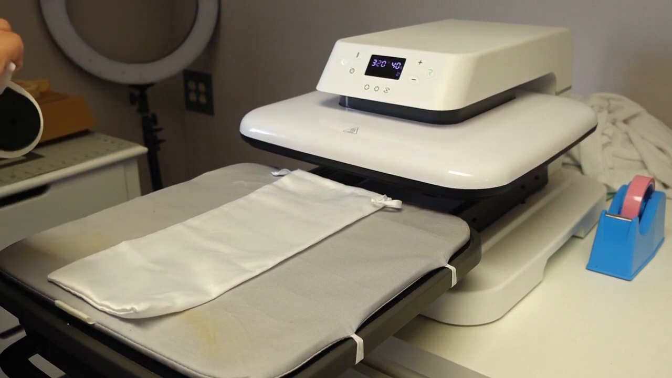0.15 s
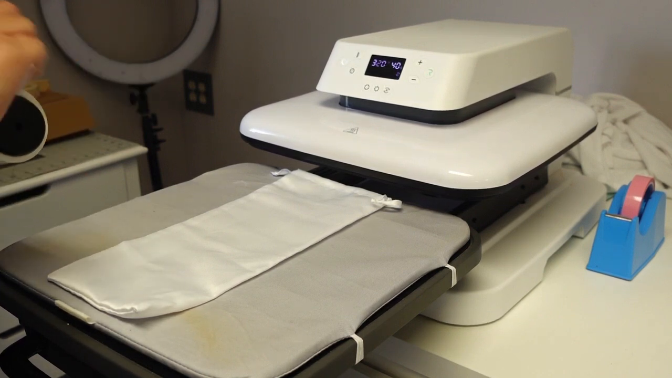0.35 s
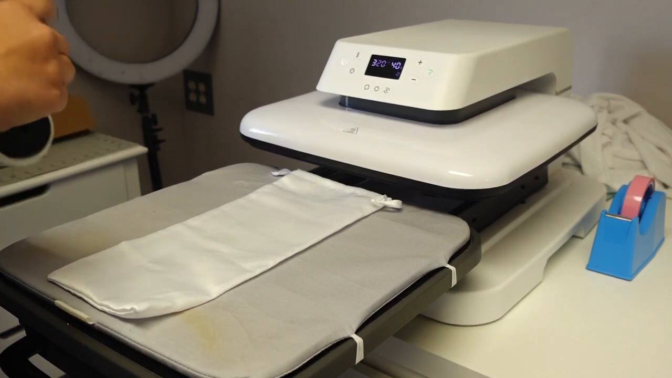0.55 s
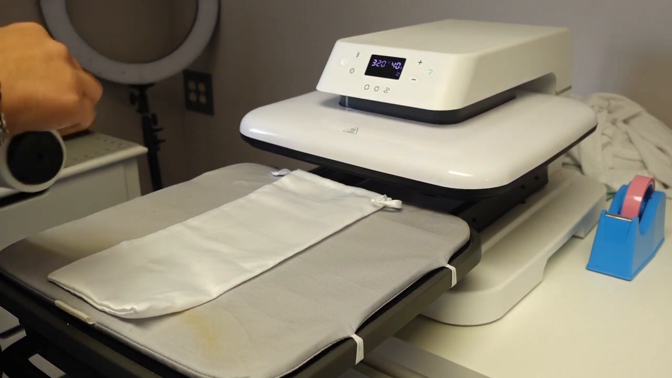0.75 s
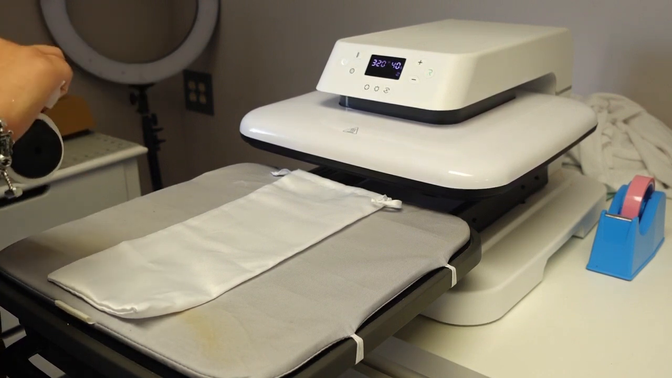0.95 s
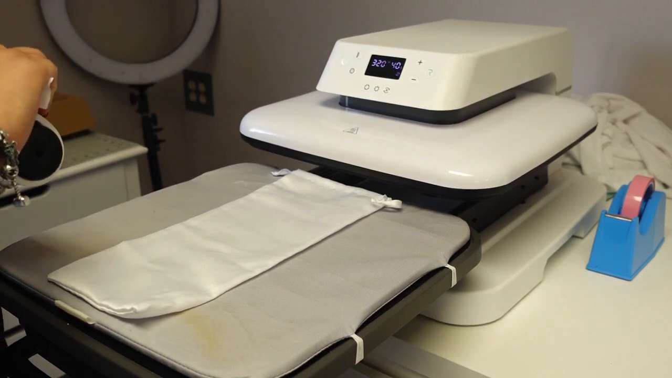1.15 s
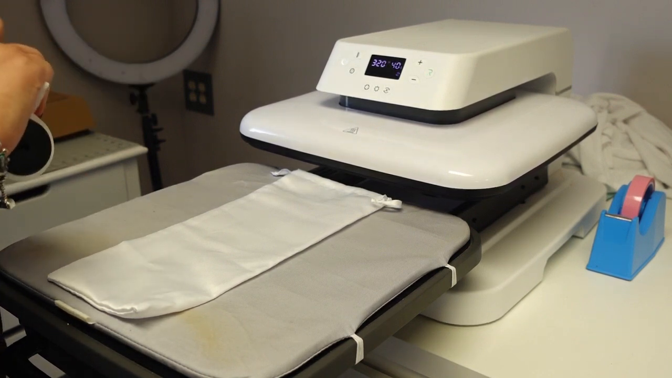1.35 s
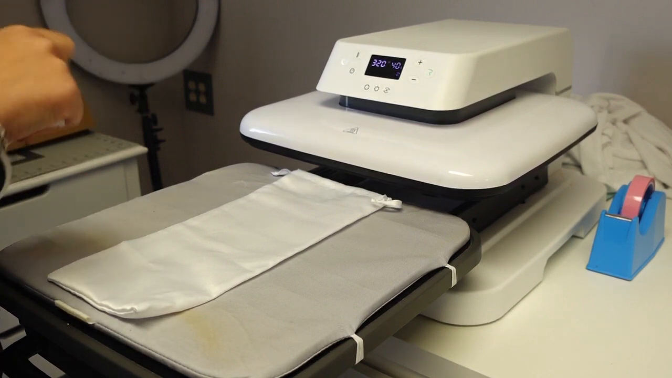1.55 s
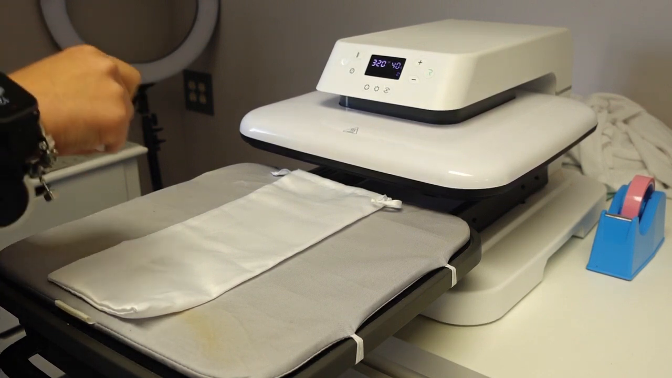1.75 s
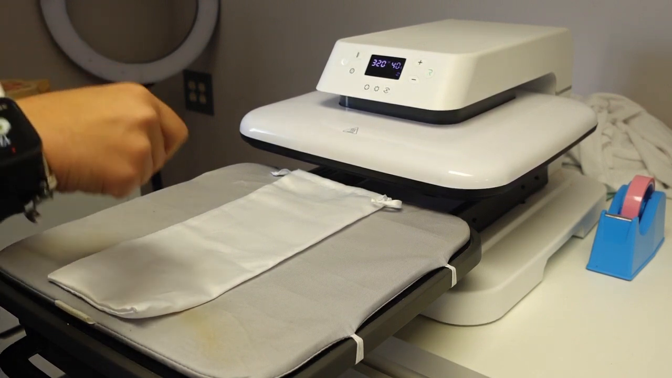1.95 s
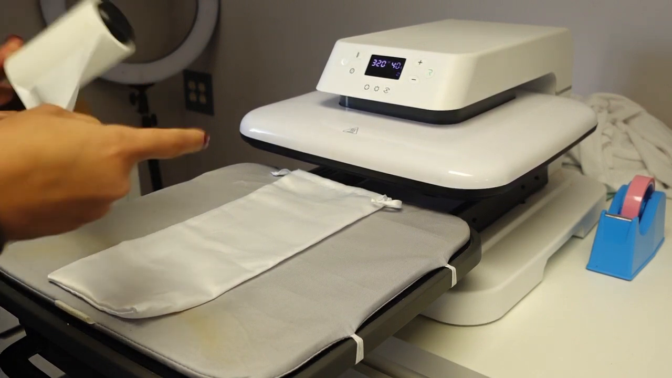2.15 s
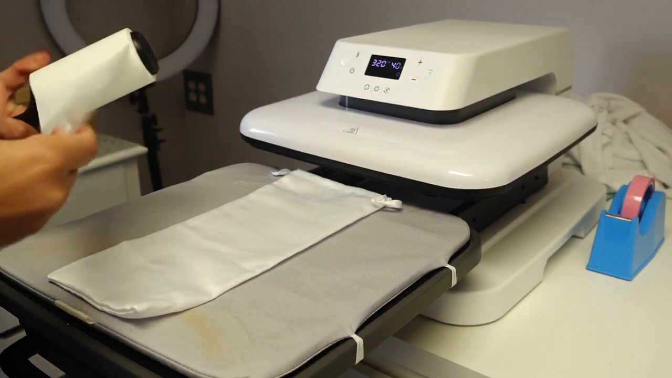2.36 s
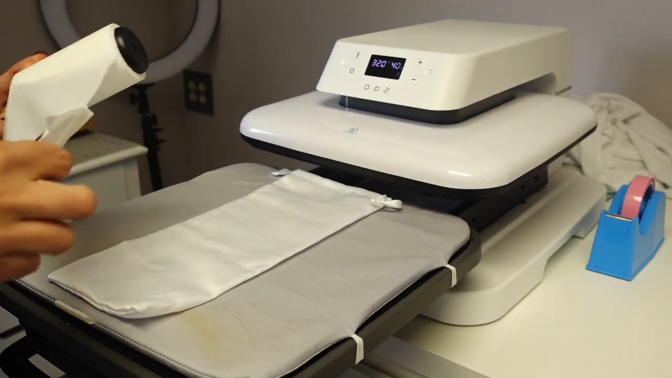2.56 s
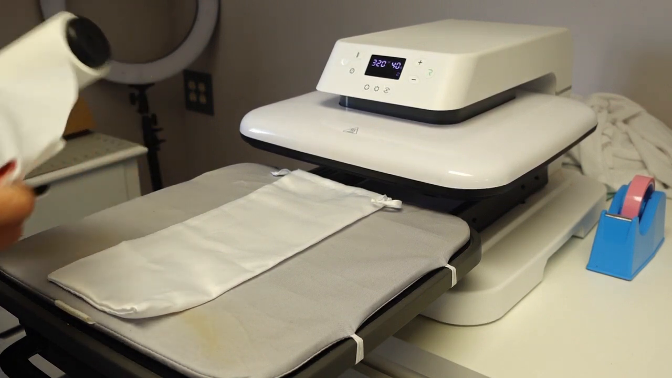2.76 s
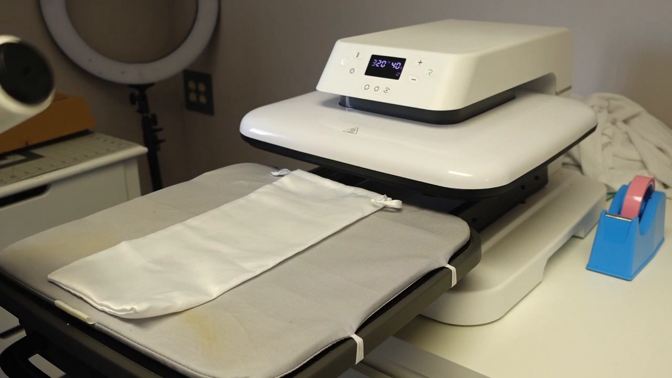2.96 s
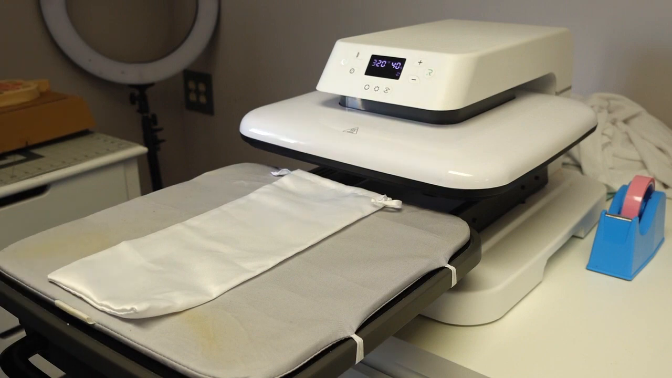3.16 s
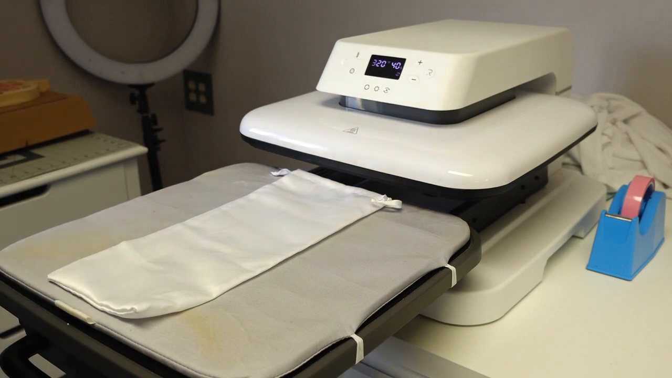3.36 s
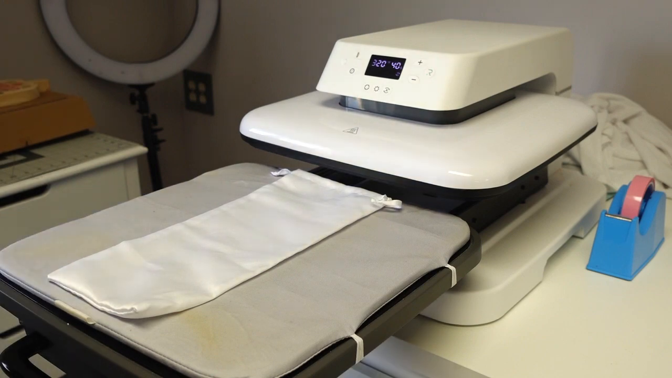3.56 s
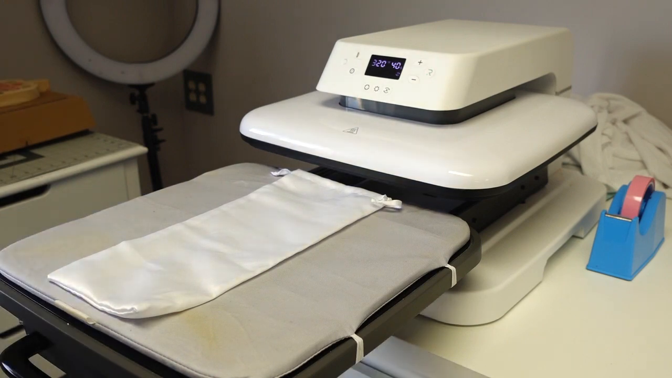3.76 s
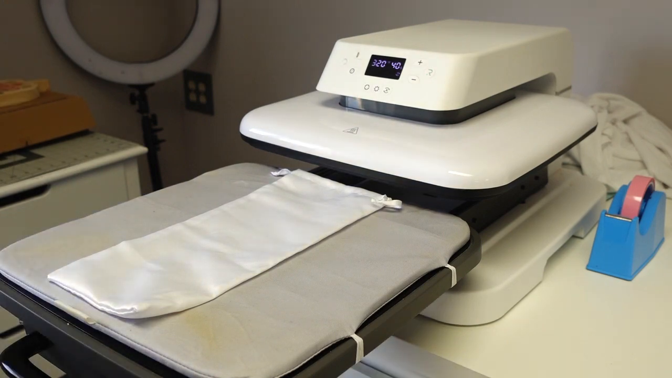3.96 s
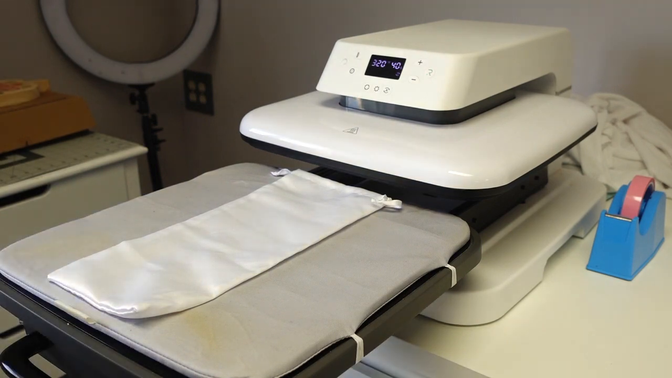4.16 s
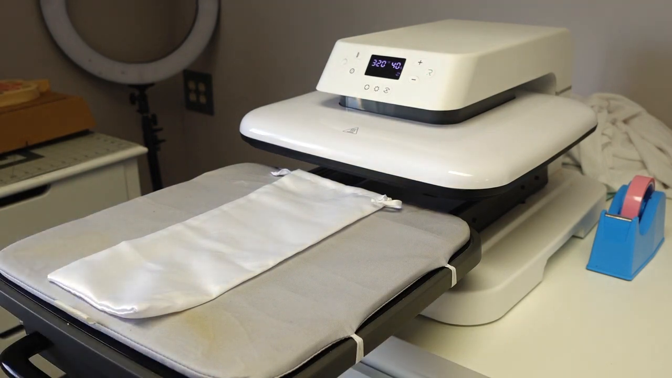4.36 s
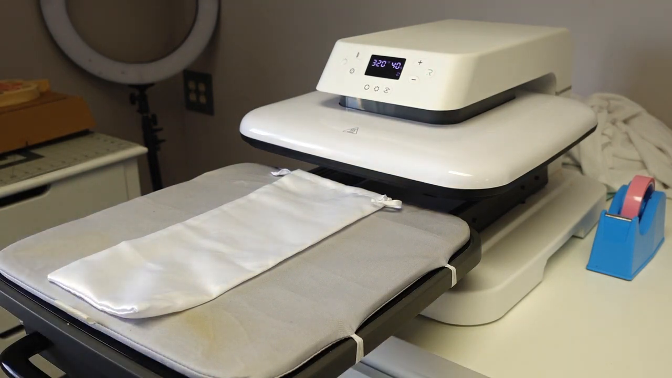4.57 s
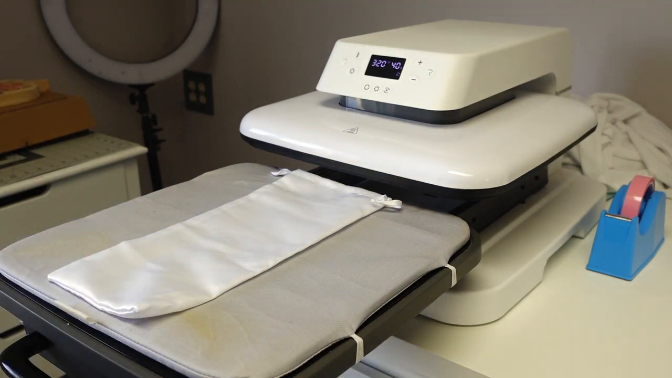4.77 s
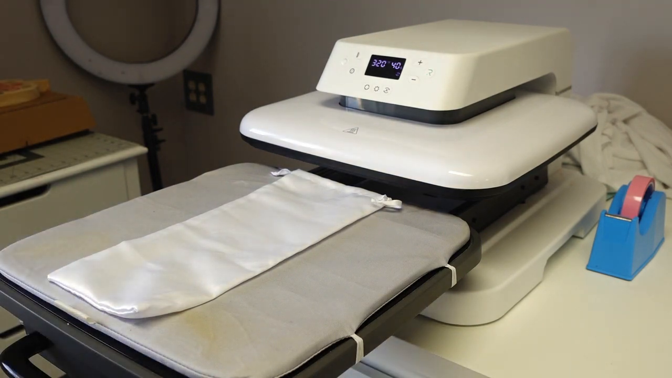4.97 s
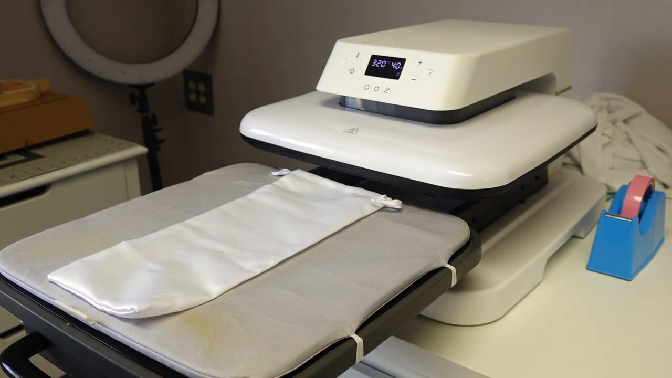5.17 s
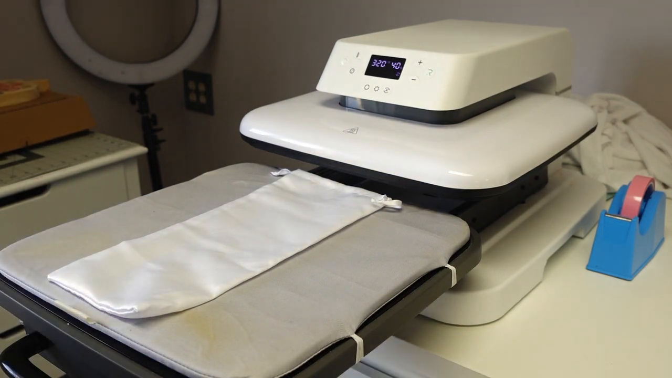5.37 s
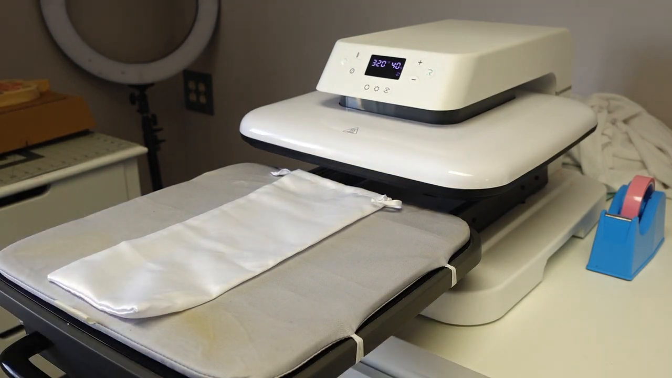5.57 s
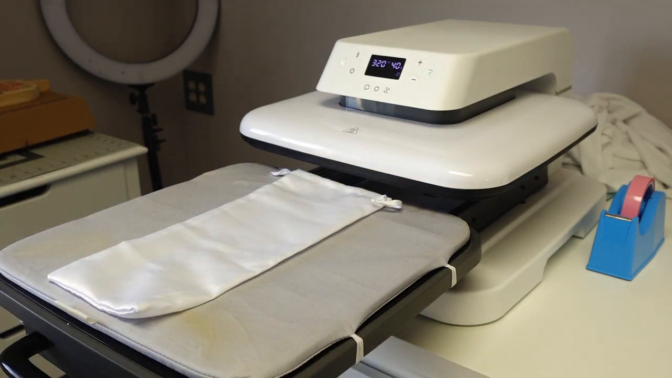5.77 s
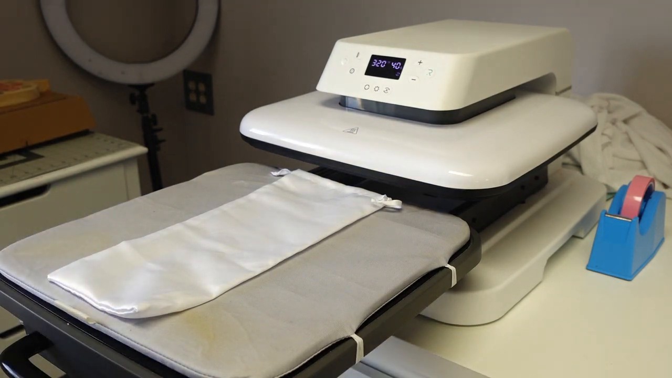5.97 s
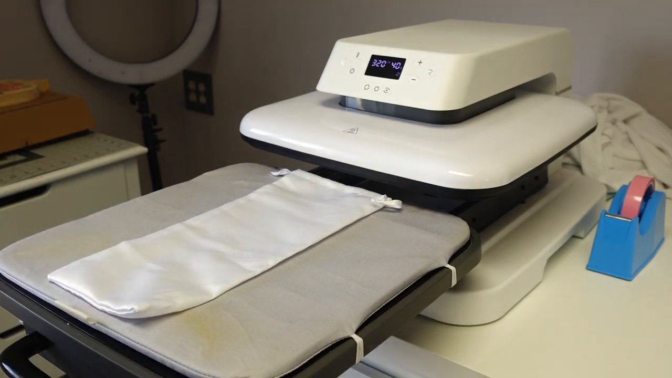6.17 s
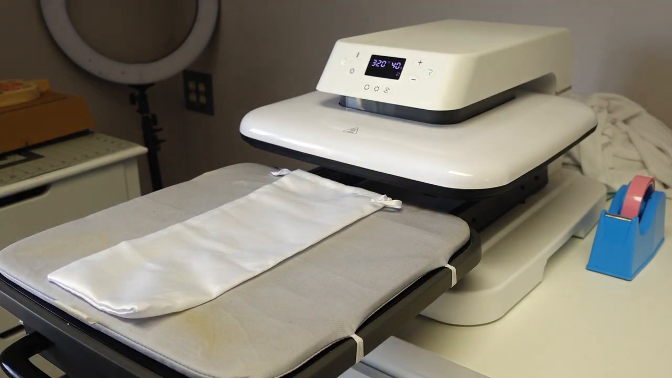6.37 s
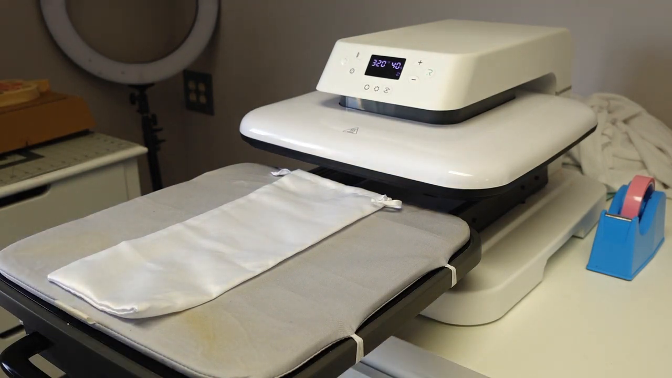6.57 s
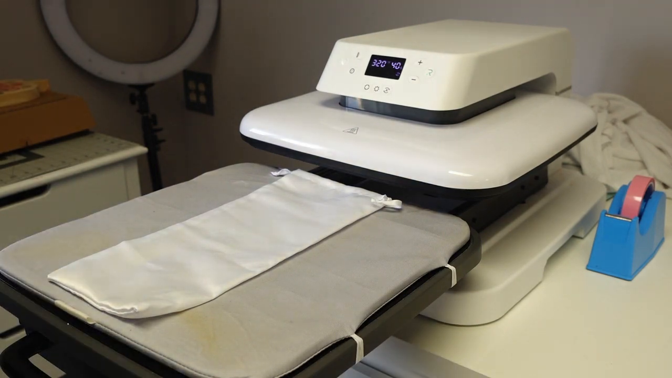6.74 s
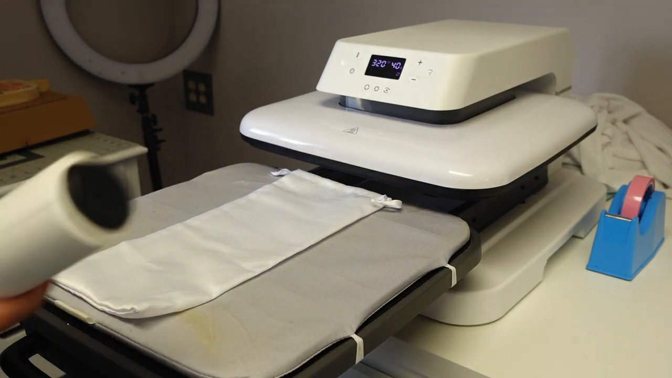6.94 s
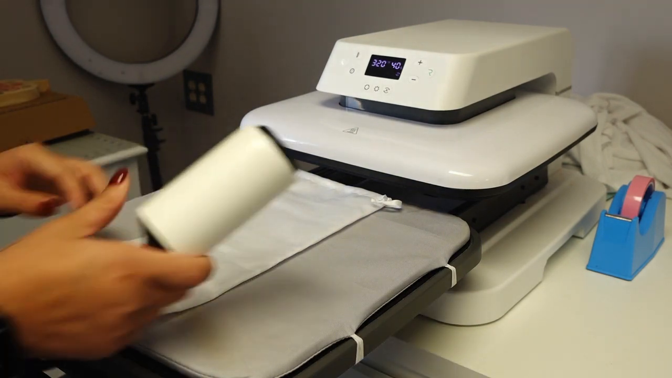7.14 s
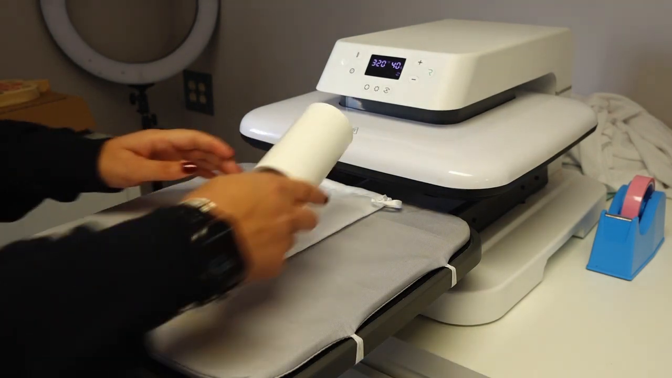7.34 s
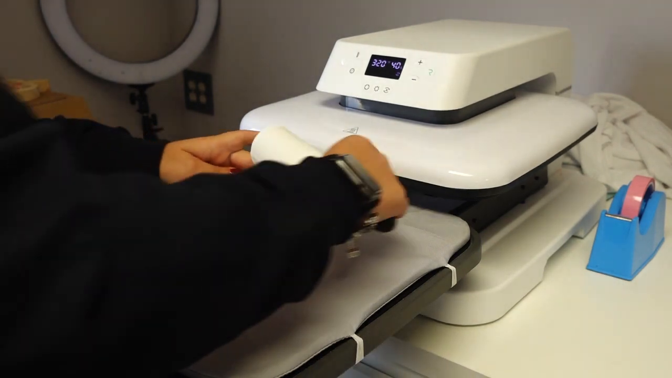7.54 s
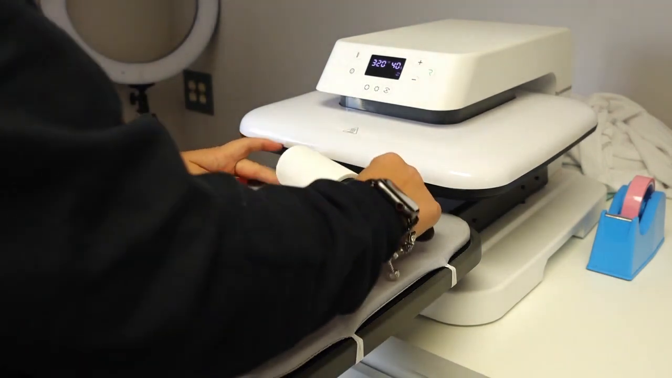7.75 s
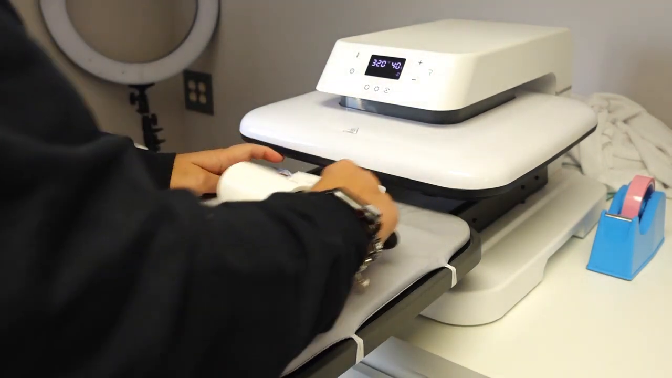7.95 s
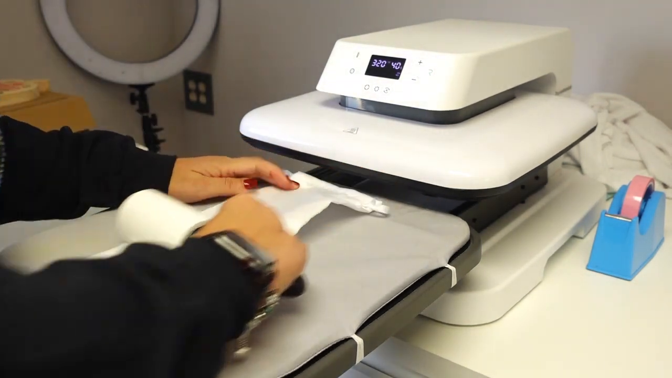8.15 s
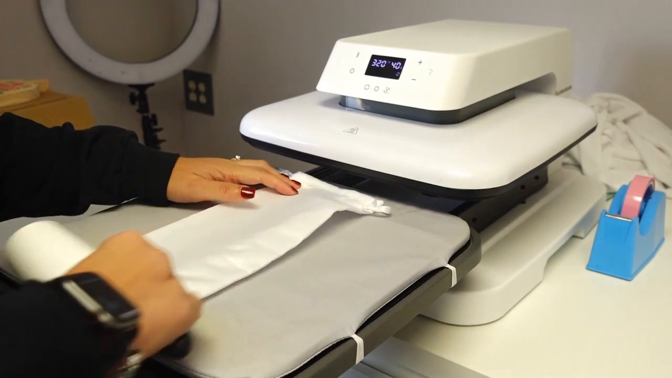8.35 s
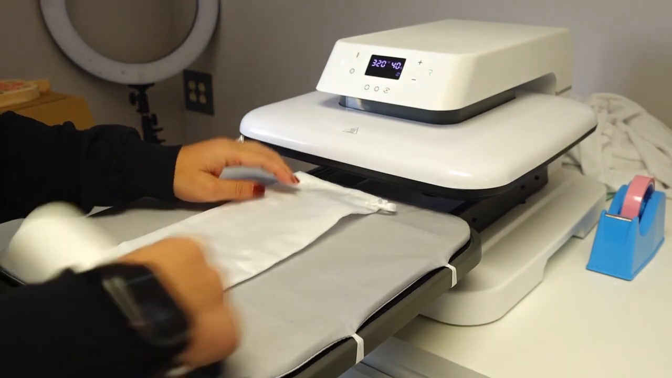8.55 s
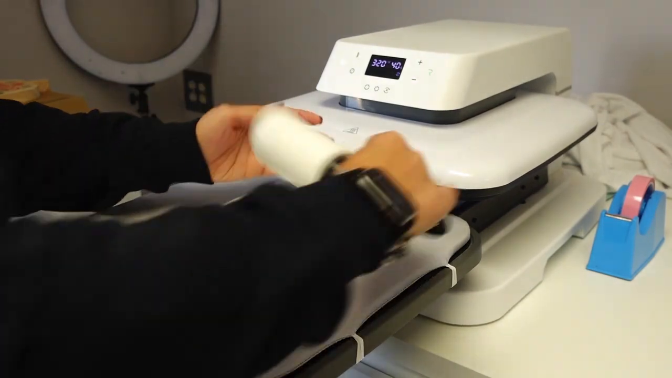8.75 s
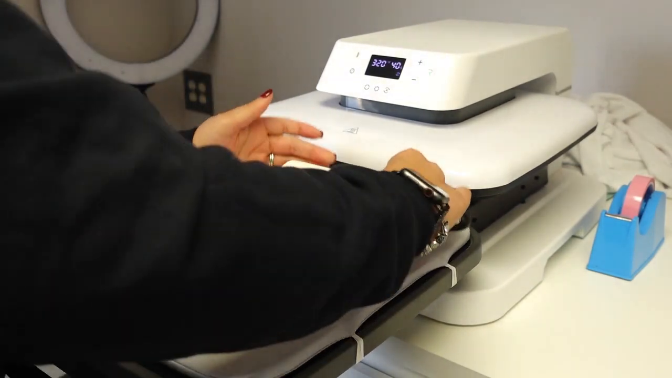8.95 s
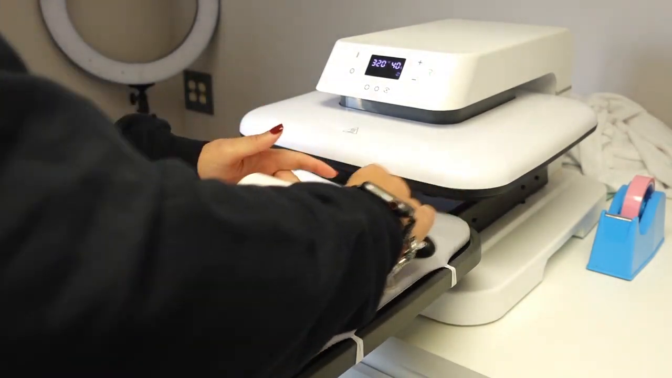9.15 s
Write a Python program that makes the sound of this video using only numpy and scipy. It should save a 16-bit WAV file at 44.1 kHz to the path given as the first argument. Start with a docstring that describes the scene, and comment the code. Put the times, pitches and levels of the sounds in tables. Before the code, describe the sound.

A heat press fan whirs softly throughout, airy with a thin high whine, rising slightly near the end. At 0-0.5 s fingers scrape a sticky sheet, with a sharp snap and short tug around 0.3 s and crinkly ticks. Bright picking and a hard click come at 0.8-1.2 s, a loud snap at 1.3 s, then harsh tearing peels from 1.4 to 2.25 s. Dense crumpling crackles follow, with strong snaps and a dull thud around 2.8-3.4 s, thinning into small crinkles until 5 s. Mostly fan and faint sleeve rustles remain until 7 s. Plastic squeaks and a click occur near 7.3 s. A tacky, grainy roll swells from 7.8 to 8.5 s, with a faint squeak and closing soft thud; after a pause, a knock and snap start a second roll at 8.95 s, still sounding at the end. Close stereo, small furnished room.

```python
"""Lint roller in a craft room

Fingers pick at the used sheet, rip it off in several pulls and crumple it; the roller is then rolled over a fabric bag.
Rubbing and peeling are streams of tiny random releases of glue and fibre, filtered and shaped into strokes.
The sheet snaps and ticks as noise bursts; roller and padded table thud as damped modes; slipping plastic squeaks.
Behind them a heat press fan whirs: air noise, housing resonances and a thin motor whine."""
import sys
import numpy as np
from scipy import signal
from scipy.fft import rfft, irfft
from scipy.io import wavfile
from scipy.ndimage import uniform_filter1d, minimum_filter1d

SR = 44100
rng = np.random.default_rng(int(sys.argv[2]) if len(sys.argv) > 2 else 0)


def wrap_up_sound(samples):
    """Save the sound to the file named by the first command line argument, as 16-bit audio."""
    columns = np.atleast_2d(samples).T
    # keep every value between -1 and 1, then stretch to whole-number steps
    tamed = np.clip(columns, -1, 1)
    steps = np.round(tamed * 32767).astype(np.int16)
    wavfile.write(sys.argv[1], SR, steps)


N = 406161
TIME = np.arange(N) / SR
TOP_HZ = 16000

# In stroke tables, level is that of 2.8-8 kHz; body (below) and edge (above) are relative to it, at stroke start.
# fingertip sliding over the sheet, then picking along its edge:
# (time [s], length [s], level [dB], body [dB], edge [dB], kind)
FINGER_STROKES = [(0.0, 0.247, -49.5, -7, 7, "slide"), (0.232, 0.041, -44.5, -34, 11.5, "slide"),
                  (0.767, 0.107, -54.5, -11, 5, "pick"), (0.889, 0.4, -43, -12, 1.5, "pick")]
# hand squeezing the loose sheet: (time [s], length [s], level [dB], body [dB], edge [dB])
SQUEEZES = [(0.437, 0.015, -40, -5, -8), (2.279, 0.046, -35.5, -4, -4.5), (2.385, 0.056, -38.5, -1.5, 0.5),
            (2.469, 0.06, -35.5, -8, -1.5), (2.64, 0.16, -46.5, -3.5, -2), (2.775, 0.1, -44.5, 1.5, -5),
            (2.895, 0.057, -55, 2, 4), (3.026, 0.062, -52.5, -9, 5), (3.075, 0.15, -44, -5.5, 3),
            (3.51, 0.023, -42, -3, -25), (3.585, 0.03, -47, 2, -17), (3.717, 0.026, -44.5, -1, -1),
            (3.945, 0.098, -43.5, -0.5, -7), (4.054, 0.12, -39.5, -3, -4), (4.207, 0.096, -42, -6.5, -0.5),
            (4.411, 0.11, -45, -11, -3.5), (4.548, 0.032, -41.5, -6.5, -7)]


def undb(db):
    """Decibels to amplitude."""
    return 10 ** (np.asarray(db) / 20)


def unit(x):
    """Scale to rms 1."""
    return x / np.sqrt(np.mean(x ** 2) + 1e-20)


def add(out, start_s, x):
    """Mix x into out at start_s."""
    i = max(int(start_s * SR), 0)
    out[i:i + len(x)] += x[:N - i]


def decay_at(t, t60_s):
    """Exponential decay, -60 dB at t60_s."""
    return np.exp(-np.log(1000) * t / t60_s)


def fade(t60_s):
    """Decay envelope that ends at -60 dB."""
    t60_s_floored = max(t60_s, .005)
    return decay_at(np.arange(int(t60_s_floored * SR)) / SR, t60_s)


def smooth_noise(size, window, passes=1):
    """Slow random motion: moving-averaged noise of rms 1."""
    x = rng.standard_normal(size)
    for _ in range(passes):
        x = uniform_filter1d(x, size=window)
    return unit(x)


def colour(x, outline, peaks=()):
    """Filter by an outline (frequency [Hz], gain [dB]) plus bumps (centre [Hz], width [Hz], gain [dB])."""
    hz = np.maximum(np.arange(len(x) // 2 + 1) * SR / len(x), 1)
    outline_hz, outline_db = np.transpose(outline)
    gain_db = np.interp(np.log(hz), np.log(outline_hz), outline_db)
    for centre_hz, width_hz, peak_db in peaks:
        gain_db = gain_db + peak_db / (1 + (2 * (hz - centre_hz) / width_hz) ** 2)
    return irfft(rfft(x) * undb(gain_db), len(x))


def ring(x, hz, width_hz):
    """One two-pole resonance."""
    hz = min(hz, .45 * SR)
    b, a = signal.iirpeak(hz, hz / min(width_hz, SR / 4), fs=SR)
    return signal.lfilter(b, a, x)


def low_cut(x, hz):
    """Small, light things radiate little bass."""
    return signal.sosfilt(signal.butter(3, hz, "high", fs=SR, output="sos"), x)


def split(x):
    """Body below 2.8 kHz, middle, and edge from 8 kHz to TOP_HZ."""
    hz = np.arange(len(x) // 2 + 1) * SR / len(x)
    spectrum = rfft(x) * (hz < TOP_HZ)
    body = irfft(spectrum / (1 + (hz / 2800) ** 12), len(x))
    below_edge = irfft(spectrum / (1 + (hz / 8000) ** 12), len(x))
    return body, below_edge - body, irfft(spectrum, len(x)) - below_edge


def releases(size, rate_per_s, spread_db):
    """Tiny bonds let go at random moments, with exponentially scattered dB strengths and random sign."""
    happens = rng.random(size) < rate_per_s / SR
    strength = np.minimum(rng.exponential(size=size), 5)
    return unit(happens * undb(spread_db * strength) * rng.choice([-1, 1], size))


def contact(strokes, outline, rate_per_s, spread_db, catch_db, attack_s, release_t60_s,
            sag_db_per_s, dull_db_per_s, uneven_db, peaks=()):
    """Strokes of rubbing or peeling: releases that catch and slip within milliseconds under uneven pressure.

    Level falls by sag and body rises by dull while a stroke is held; negative rates do the reverse."""
    out = np.zeros(N)
    pressure = smooth_noise(N, 1200, passes=2)
    for start_s, length_s, level_db, body_db, edge_db in strokes:
        t = np.arange(int((length_s + release_t60_s) * SR)) / SR
        attack = np.sin(np.pi / 2 * np.minimum(t / attack_s, 1)) ** 2
        held_s = np.clip(t - attack_s, 0, length_s)
        release = decay_at(np.maximum(t - length_s, 0), release_t60_s)
        catch = smooth_noise(len(t), 220)
        stream = releases(len(t), rate_per_s, spread_db) * undb(catch_db * catch)
        body, middle, edge = map(unit, split(colour(stream, outline, peaks)))
        sound = middle + undb(body_db + dull_db_per_s * held_s) * body + undb(edge_db) * edge
        add(out, start_s, attack * release * undb(level_db - sag_db_per_s * held_s) * sound)
    return out * undb(uneven_db * pressure)


def contact_by_kind(rows, colours, **settings):
    """Contact strokes whose last column picks the colour."""
    out = np.zeros(N)
    for kind, outline in colours.items():
        strokes = [row[:-1] for row in rows if row[-1] == kind]
        out += contact(strokes, outline, **settings)
    return out


def pulls():
    """Glue tears off the roll in quick pulls that ring the tube."""
    # pulls on the used sheet: (time [s], length [s], level [dB], body [dB], edge [dB], kind)
    strokes = [(0.27, 0.019, -18.5, -8, 0.5, "tug"), (0.297, 0.06, -29, -5.5, -5, "tug"),
               (0.365, 0.062, -39.5, -4.5, -15, "tug"), (1.41, 0.078, -20, -8.5, -4, "peel"),
               (1.48, 0.067, -19.5, -4, -1, "peel"), (1.558, 0.094, -31, -2.5, 0.5, "peel"),
               (1.612, 0.077, -17, -4.5, 0.5, "peel"), (1.702, 0.05, -18.5, -0.5, 0.5, "peel"),
               (1.854, 0.13, -40, -5, 4.5, "rip"), (1.896, 0.11, -16, -8.5, -1, "rip"),
               (2.0, 0.066, -27.5, -2, 5, "rip"), (2.047, 0.09, -20.5, -12.5, 0.5, "unwind"),
               (2.147, 0.044, -25, -4.5, -4, "unwind"), (2.192, 0.045, -31, -3.5, -10, "unwind")]
    # colours of the four kinds of pull: (frequency [Hz], gain [dB])
    tug = [(60, -65), (200, -59), (750, -20), (1050, 0), (1900, 3.5), (2800, 6.5), (3700, -9), (5500, -2),
           (9000, 0), (16000, 8)]
    peel = [(60, -52), (140, -37), (220, -28), (300, -23), (480, -7.5), (800, -4), (1150, 7.5), (1650, 5.5),
            (1950, 8), (2600, 1), (4000, -1), (8500, 0), (16000, -6.5)]
    rip = [(60, -51), (130, -40), (330, -17), (430, -21), (540, -5.5), (660, -9.5), (770, -2), (1000, -6.5),
           (1650, -2), (1830, 2.5), (2150, -10), (2500, -3), (3400, -7.5), (5000, -3.5), (9500, -1),
           (16000, -2.5)]
    unwind = [(60, -42), (200, -36), (500, -10.5), (1100, -2.5), (1400, -3.5), (2600, -0.5), (3400, 3.5),
              (3850, 7), (4400, 4.5), (10000, 4), (16000, 0)]
    # resonances of roller and taut sheet: (centre [Hz], width [Hz], gain [dB])
    tube = [(223, 40, 3), (2490, 50, 0.5), (5030, 260, -0.5), (6600, 230, -2.5)]
    return contact_by_kind(strokes, {"tug": tug, "peel": peel, "rip": rip, "unwind": unwind},
                           rate_per_s=5500, spread_db=2.0, catch_db=0.3, attack_s=0.035, release_t60_s=0.13,
                           sag_db_per_s=41, dull_db_per_s=93, uneven_db=1.1, peaks=tube)


def snaps(crack_db=-1, crack_t60_s=0.011, cut_hz=310, ring_db=6, ring_share=0.53):
    """A crack as the glue gives, then a dying flurry of releases ringing the loose sheet."""
    # sheet snapping loose, gains before the mix:
    # (time [s], level [dB], t60 [s], body gain [dB], edge gain [dB], sheet ring [Hz])
    events = [(0.2814, -9.5, 0.08, -28, 2, 7000), (0.879, -22, 0.025, -16, 2, 8300),
              (.886, -22.5, 0.095, 1, -1, 2600), (1.2744, -9.5, 0.28, 5, -3.5, 4930),
              (2.812, -21, 0.063, 12, -9, 1280), (2.8442, -19, 0.047, 6, 2.5, 4800),
              (3.166, -11, 0.12, 3.5, -1.5, 1350), (3.171, -16, 0.29, 11, -27, 2170),
              (3.3599, -9.5, 0.35, 7, -6.5, 3770), (7.359, -24, 0.1, -4, -6, 4800),
              (7.372, -31, 0.08, -11, 2, 3000), (8.94, -24, 0.062, 3, -6, 1200)]
    # colour of the snaps: (frequency [Hz], gain [dB])
    outline = [(60, -30), (150, -48), (500, -14.5), (900, -9.5), (2000, -5.5), (3200, 2), (4500, 4.5),
               (7500, 5), (10000, 7), (16000, -4.5)]
    out = np.zeros(N)
    for start_s, level_db, t60_s, body_db, edge_db, hz in events:
        sheet = [(hz, ring_share * hz, ring_db)]
        bonds = releases(SR // 2, 16000, 2.2)
        body, middle, edge = split(unit(colour(bonds, outline, sheet)))
        flurry = undb(level_db) * (middle + undb(body_db) * body + undb(edge_db) * edge)
        t = TIME[:len(flurry)]
        crack = 1 + undb(crack_db) * decay_at(t, crack_t60_s)
        add(out, start_s, flurry * decay_at(t, t60_s) * crack)
    return low_cut(out, cut_hz)


def fingers():
    """A fingertip scrapes lightly on the sticky sheet, in separate small crackles."""
    # colours of sliding and picking: (frequency [Hz], gain [dB])
    slide = [(200, -61), (2000, -45), (4500, -9), (5600, -2), (6300, 5), (7100, 1), (10000, -0.5),
             (11000, -3), (16000, -1)]
    pick = [(200, -77), (2000, -34), (3500, -23), (4150, 6.5), (5500, 9.5), (7000, 4), (8200, 5.5),
            (10500, -1), (16000, -1.5)]
    return contact_by_kind(FINGER_STROKES, {"slide": slide, "pick": pick},
                           rate_per_s=3600, spread_db=4.5, catch_db=-0.5, attack_s=0.0037, release_t60_s=0.093,
                           sag_db_per_s=4.5, dull_db_per_s=-23, uneven_db=-0.5)


def nail(per_s=24, above_db=5, hz=4900, t60_s=0.032):
    """While it picks, the nail catches at random on the sheet's edge, which rings for a moment."""
    out = np.zeros(N)
    scatter_db, scatter_octaves, width_hz = 2.5, .15, 450
    decay = fade(t60_s)
    for start_s, length_s, level_db, *_, kind in FINGER_STROKES:
        delays_s = rng.random(16) * 16 / per_s
        for delay_s, (size, pitch) in zip(delays_s, rng.standard_normal((16, 2))):
            if kind == "pick" and delay_s < length_s:
                noise = rng.standard_normal(len(decay))
                edge = unit(ring(noise, hz * 2 ** (scatter_octaves * pitch), width_hz))
                add(out, start_s + delay_s, undb(level_db + above_db + scatter_db * size) * decay * edge)
    return out


def crumple():
    """The squeezed sheet crackles in dense releases."""
    # colour of crumpling: (frequency [Hz], gain [dB])
    outline = [(120, -54), (300, -18), (600, -14.5), (1200, -2.5), (2400, 5.5), (3500, 4), (6000, 7),
               (10000, -8.5), (16000, -13.5)]
    return contact(SQUEEZES, outline, rate_per_s=3400, spread_db=2.5, catch_db=1, attack_s=0.023,
                   release_t60_s=0.18, sag_db_per_s=9, dull_db_per_s=-2, uneven_db=1)


def small_creases(per_s=14, above_db=8, scatter_db=3, centre_hz=4500, scatter_octaves=0.42, t60_s=.025):
    """Rows of weak random ticks during each squeeze, their level following the squeeze's."""
    rows = []
    for start_s, length_s, level_db, _, _ in SQUEEZES:
        delays_s = rng.random(8) * 8 / per_s
        for delay_s, (size, pitch) in zip(delays_s, rng.standard_normal((8, 2))):
            if delay_s < length_s:
                tick_db = level_db + above_db + scatter_db * size
                tick_hz = centre_hz * 2 ** (scatter_octaves * pitch)
                rows.append((start_s + delay_s, tick_db, tick_hz, t60_s))
    return rows


def ticks(click_t60_s=0.0027, tail_db=-10, broad=0.26, cut_hz=500):
    """A crease buckles: a sharp click and a short rustle around its own pitch."""
    # louder creases and fingernail ticks: (time [s], click level [dB], centre [Hz], tail t60 [s])
    loud_ticks = [(0.0608, -22, 6250, 0.054), (0.241, -27, 10000, 0.042), (0.4514, -16.5, 4320, 0.068),
                  (0.4895, -17, 4500, 0.074), (0.4947, -16, 8350, 0.04), (0.7045, -36, 2850, 0.039),
                  (0.8767, -8, 8500, 0.028), (0.8827, -16, 11000, 0.02), (2.259, -24, 2280, 0.045),
                  (2.4148, -18, 6050, 0.026), (2.4334, -16.5, 5740, 0.045), (2.4778, -19, 5060, 0.045),
                  (2.5264, -18, 6160, 0.029), (2.5364, -13, 7200, 0.035), (2.604, -23.5, 4020, 0.035),
                  (2.6598, -25.5, 6630, 0.03), (2.698, -20, 3180, 0.028), (2.7817, -23.5, 4020, 0.025),
                  (2.7892, -15.5, 2600, 0.035), (2.881, -18, 5160, 0.019), (2.9123, -28, 5090, 0.029),
                  (3.056, -28, 11200, 0.026), (3.1527, -9, 8900, 0.02), (3.5216, -26, 4600, 0.035),
                  (3.5573, -21, 10500, 0.038), (3.6097, -28, 2830, 0.039), (3.628, -23, 2690, 0.033),
                  (3.711, -27.5, 2780, 0.067), (3.902, -30, 4470, 0.15), (4.145, -20.5, 5830, 0.061),
                  (4.5615, -29, 4560, 0.048), (4.9897, -28, 7280, 0.062), (4.995, -23.5, 7900, 0.081),
                  (5.733, -32.5, 3970, 0.086), (5.852, -35, 12000, 0.02), (6.4154, -31.5, 2780, 0.03),
                  (7.023, -34.5, 2900, 0.035), (7.125, -36, 10000, 0.046), (7.639, -27, 1490, 0.063)]
    # colour of the ticks: (frequency [Hz], gain [dB])
    outline = [(100, -44), (500, -33), (1500, 2.5), (4000, 5), (9000, 5.5), (16000, -1.5)]
    out = np.zeros(N)
    for start_s, level_db, hz, t60_s in loud_ticks + small_creases():
        noise = colour(rng.standard_normal(SR // 8), outline)
        t = TIME[:len(noise)]
        shape = decay_at(t, click_t60_s) + undb(tail_db) * decay_at(t, t60_s)
        add(out, start_s, undb(level_db) * shape * unit(ring(noise, hz, 0.35 * hz) + broad * noise))
    return low_cut(out, cut_hz)


def roll():
    """The sticky roller runs over the bag: a dense stream of releases that swells slowly."""
    # strokes over the bag: (time [s], length [s], level [dB], body [dB], edge [dB])
    strokes = [(7.755, 0.67, -32.5, -10.5, -6), (8.96, 0.66, -32, -7.5, -6)]
    # colour of rolling: (frequency [Hz], gain [dB])
    outline = [(100, -41), (220, -24), (500, -7.5), (1200, 0), (1600, 5.5), (2100, 2), (3100, 1),
               (4200, -3), (5500, -2.5), (8000, -8.5), (12000, -15), (16000, -20)]
    return contact(strokes, outline, rate_per_s=9000, spread_db=1.0, catch_db=0.5, attack_s=0.3,
                   release_t60_s=0.36, sag_db_per_s=3, dull_db_per_s=11, uneven_db=0.4)


def sleeves():
    """Sleeves and hands brush past: very dense fibre releases."""
    # brushes: (time [s], length [s], level [dB], body [dB], edge [dB])
    strokes = [(5.02, 0.23, -64, 3.5, 2), (5.475, 0.04, -50, -4, 1), (5.59, 0.025, -47, -6, -2.5),
               (5.76, 0.08, -53, -5, -5), (5.825, 0.071, -55.5, -5, 1.5), (6.44, 0.018, -49.5, 2, 8),
               (6.52, 0.32, -67.5, 6, 2), (6.69, 0.13, -48, -23, 4), (6.82, 0.11, -50, -19, 4.5),
               (7.0, 0.056, -54.5, 6, -1), (7.295, 0.067, -45.5, -4, -4), (7.345, 0.026, -31.5, -12, -10),
               (7.465, 0.093, -51.5, -12, 6), (7.71, 0.2, -61, -2, 4), (8.75, 0.076, -59, -20, 3),
               (8.89, 0.059, -51, -17, -2)]
    # colour of brushing: (frequency [Hz], gain [dB])
    outline = [(150, -39), (800, -12.5), (2000, -13), (3400, 5), (5500, 9.5), (10000, -1), (16000, -5.5)]
    return contact(strokes, outline, rate_per_s=11000, spread_db=-2.5, catch_db=2.0, attack_s=0.031,
                   release_t60_s=0.19, sag_db_per_s=-3, dull_db_per_s=4, uneven_db=1.5)


def squeaks():
    """Slipping plastic swells a narrow resonance, then lets it go."""
    # grip and axle: (time [s], level before the swell [dB], centre [Hz], width of each resonator [Hz], length [s])
    events = [(7.014, -42.5, 2000, 700, 0.032), (7.298, -38, 1440, 600, 0.031),
              (7.317, -31.5, 1450, 450, 0.034), (7.342, -38, 1870, 600, 0.045),
              (7.357, -34.5, 2990, 200, 0.051), (8.17, -43.5, 1610, 70, 0.23),
              (8.202, -37, 2460, 45, 0.068)]
    out = np.zeros(N)
    for start_s, level_db, hz, width_hz, length_s in events:
        swell = np.sqrt(np.hanning(int(length_s * SR)))
        slips = releases(SR, 2200, 1.2)
        tone = ring(ring(slips, hz, width_hz), hz, width_hz)
        add(out, start_s, undb(level_db) * swell * unit(tone[-len(swell):]))
    return out


def thuds(rise_s=0.0043, dull_db=-10):
    """Contact swells one low, damped mode with padding noise; its hardness sets the ring of the plastic handle."""
    # knocks on roller and padded table, before the low cut:
    # (time [s], level [dB], pitch [Hz], t60 [s], handle relative to level [dB])
    knocks = [(1.533, -41.5, 233, .2, -20), (2.847, -50.5, 230, 0.19, 7), (3.178, -27.5, 229, 0.31, -5),
              (7.639, -64, 220, .1, 19.5), (8.431, -36, 218, 0.2, -5.5), (8.939, -55.5, 200, 0.3, 20)]
    # handle modes: (frequency [Hz], relative level [dB], t60 [s])
    handle_modes = [(648, -6, 0.16), (873, 4, 0.046), (1256, 7, 0.044), (1520, -4, 0.11)]
    out = np.zeros(N)
    for start_s, level_db, hz, t60_s, hard_db in knocks:
        decay = fade(t60_s)
        t = TIME[:len(decay)]
        padding = unit(ring(ring(rng.standard_normal(SR), hz, 76), hz, 76))[:len(t)]
        low_mode = np.sin(2 * np.pi * hz * t) + undb(dull_db) * padding
        add(out, start_s, undb(level_db) * decay * (1 - np.exp(-t / rise_s)) * low_mode)
        for mode_hz, mode_db, mode_t60_s in handle_modes:
            decay = fade(mode_t60_s)
            mode = np.sin(2 * np.pi * mode_hz * TIME[:len(decay)])
            add(out, start_s, undb(level_db + hard_db + mode_db) * decay * mode)
    return out


def fan(air_db=-57.5, waver_hz=9):
    """Air noise, noise-driven housing resonances and a thin, slightly unsteady motor whine."""
    # colour of the air: (frequency [Hz], gain [dB])
    outline = [(30, -26), (120, -25), (200, -17.5), (380, -9), (600, -7), (1050, -1), (2000, -11),
               (3200, -8.5), (3800, -14.5), (4600, -11), (7000, -16), (16000, -25)]
    # housing resonances, before the fan gain: (centre [Hz], width [Hz], level [dB])
    resonances = [(592.3, 18, -73.5), (1000, 83, -66.5), (1168, 9.7, -72), (1583, 38, -73.5),
                  (2450, 110, -70.5), (2740, 21, -77)]
    # motor tones, before the fan gain: (frequency [Hz], level [dB])
    motor_tones = [(2801, -70.5), (3095, -76), (3390, -66), (6400, -81.5), (9281, -75.5)]
    # gain of the whole fan: (time [s], gain [dB])
    fan_gain = [(0, 7), (.25, 4.5), (.35, 2.5), (1.2, 1.5), (3.5, 5), (4.8, 5), (6.2, 6.5), (7.5, 9),
                (8.7, 8), (9.21, 11.5)]
    air = undb(air_db) * unit(colour(rng.standard_normal(N), outline))
    hz = np.maximum(np.arange(N // 2 + 1) * SR / N, 1)
    power = np.zeros(len(hz))
    for centre_hz, width_hz, level_db in resonances:
        power += undb(level_db) ** 2 * unit(1 / (1 + (2 * (hz - centre_hz) / width_hz) ** 2)) ** 2
    housing = irfft(rfft(rng.standard_normal(N)) * np.sqrt(power), N)
    drift_hz = waver_hz * smooth_noise(N, 2000)
    whine = np.zeros(N)
    for tone_hz, level_db in motor_tones:
        whine += undb(level_db) * unit(np.sin(2 * np.pi * np.cumsum(tone_hz + drift_hz) / SR))
    return (air + housing + whine) * undb(np.interp(TIME, *np.transpose(fan_gain)))


def flex(x, share, near_s=0.000364, sway=0.27):
    """A moving surface mirrors the sound from a changing distance, so its colour keeps shifting."""
    motion = smooth_noise(N, 3000, passes=2)
    lag_s = near_s * np.exp(sway * motion)
    return (x + share * np.interp(TIME - lag_s, TIME, x)) / np.sqrt(1 + share ** 2)


def room(x, early_db=-8, early_t60_s=0.058, late_db=-13.5, late_t60_s=0.65):
    """Quick reflections off the press and table, then the short tail of a furnished room."""
    response = np.zeros(N)
    response[0] = 1
    for start_s, level_db, t60_s in ((.003, early_db, early_t60_s), (.012, late_db, late_t60_s)):
        decay = fade(t60_s)
        echoes = decay * rng.standard_normal(SR)[:len(decay)]
        add(response, start_s, undb(level_db) * echoes / np.linalg.norm(echoes))
    return signal.fftconvolve(x, response[:SR] / np.linalg.norm(response))[:N]


def widen(x, spread_db, left_db, scatter_t60_s):
    """Scattered sound reaches the two ears differently, most in the treble; left_db is left over right."""
    # side relative to mid, before spread_db: (frequency [Hz], gain [dB])
    side_outline = [(60, -13), (200, -21), (400, -14.5), (1000, -14.5), (2000, -13), (4000, -10.5),
                    (12000, -8.5)]
    decay = fade(scatter_t60_s)
    scatter = decay * rng.standard_normal(SR)[:len(decay)]
    scattered = signal.fftconvolve(x, scatter / np.linalg.norm(scatter))[:N]
    side = undb(spread_db) * colour(scattered, side_outline)
    return np.array([(x + side) * undb(left_db / 2), (x - side) * undb(-left_db / 2)])


def scene():
    """Sheet, crinkles, rolling and fan, each with its own width; crinkles lean left."""
    sheet = fingers() + nail() + flex(pulls(), share=0.46) + undb(-3.0) * snaps()
    crinkles = flex(crumple(), share=0.21) + ticks()
    rolling = room(sleeves() + flex(roll(), share=0.18) + squeaks()) + low_cut(thuds(), 205)
    return (widen(room(sheet), spread_db=-0.5, left_db=0.0, scatter_t60_s=0.11)
            + widen(room(crinkles), spread_db=2.5, left_db=2.0, scatter_t60_s=0.047)
            + widen(rolling, spread_db=-1.5, left_db=0.4, scatter_t60_s=0.14)
            + widen(fan(), spread_db=5, left_db=0.4, scatter_t60_s=0.21))


def record(dry):
    """A fast limiter holds down the loudest peaks; a steep low-pass then cuts above TOP_HZ."""
    allowed = .93 / np.maximum(np.abs(dry).max(axis=0), .93)
    gain = uniform_filter1d(minimum_filter1d(allowed, size=89), size=89)
    low_pass = signal.ellip(10, .2, 70, TOP_HZ, fs=SR, output="sos")
    return signal.sosfilt(low_pass, gain * dry)


dry = scene()
out = record(dry)
wrap_up_sound(out)
```